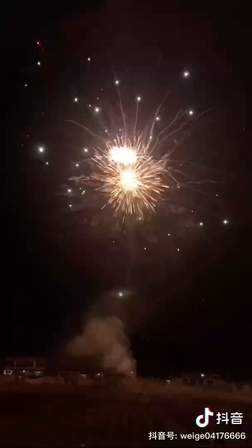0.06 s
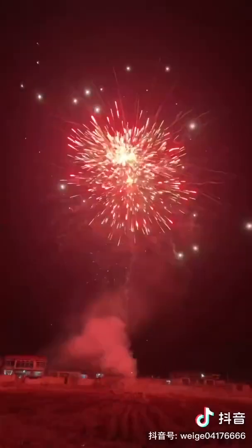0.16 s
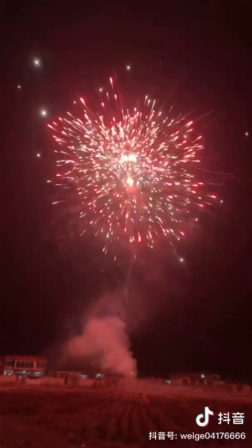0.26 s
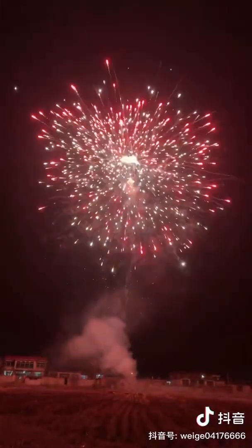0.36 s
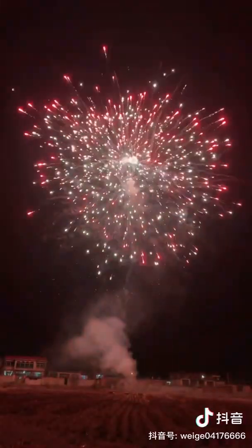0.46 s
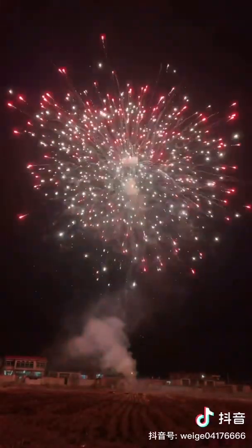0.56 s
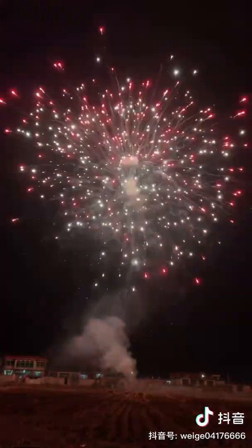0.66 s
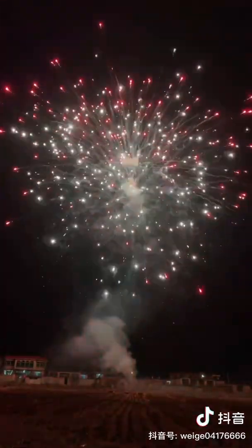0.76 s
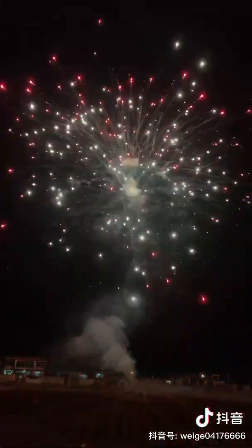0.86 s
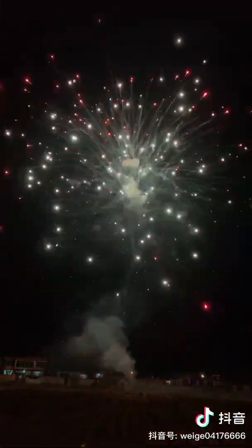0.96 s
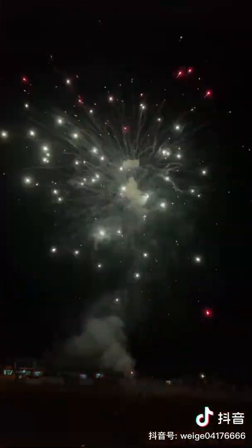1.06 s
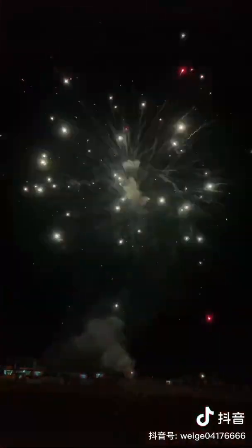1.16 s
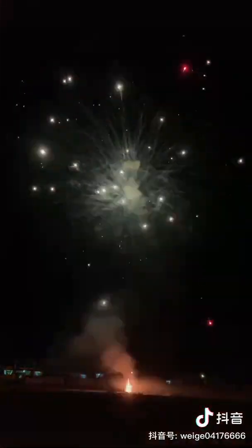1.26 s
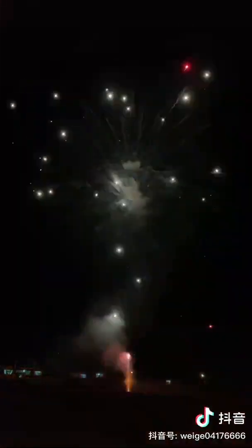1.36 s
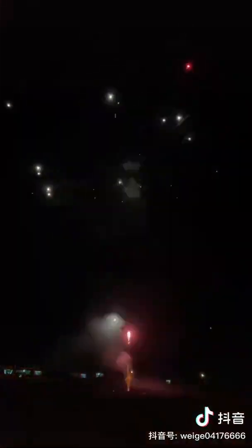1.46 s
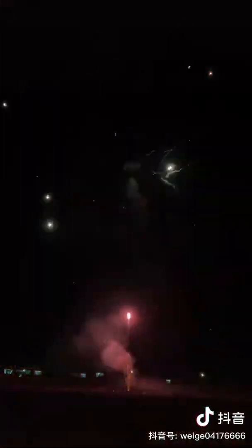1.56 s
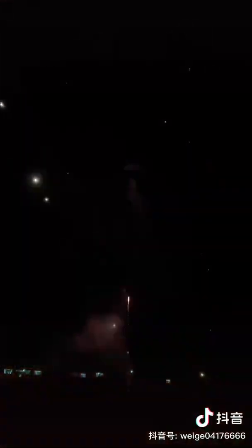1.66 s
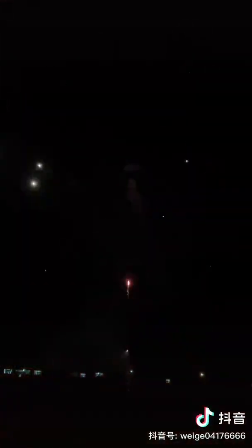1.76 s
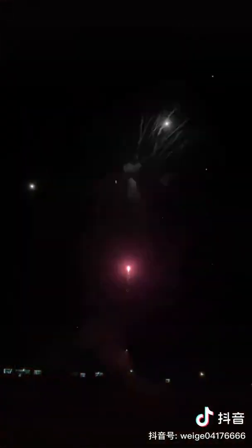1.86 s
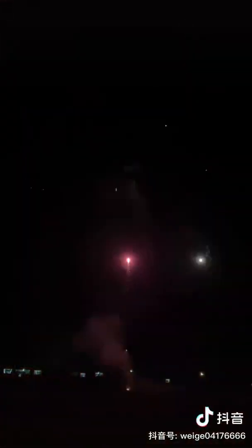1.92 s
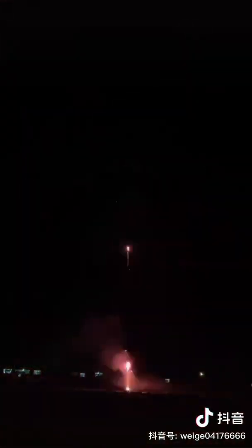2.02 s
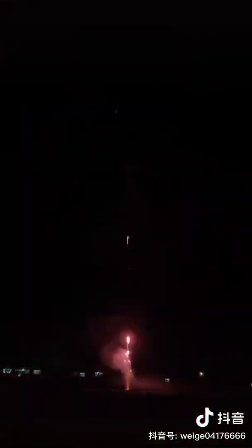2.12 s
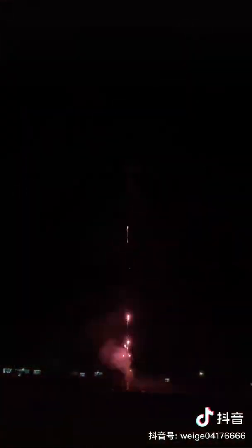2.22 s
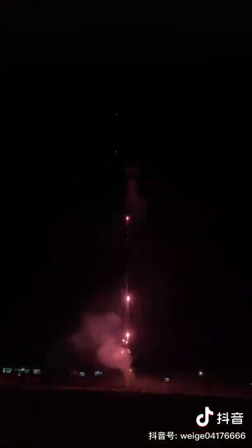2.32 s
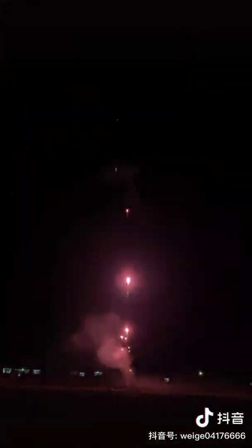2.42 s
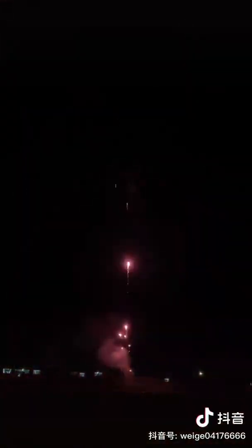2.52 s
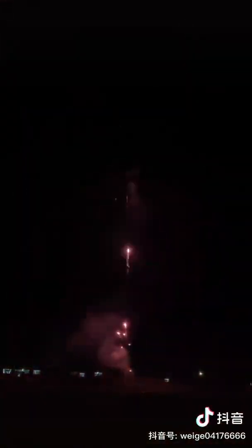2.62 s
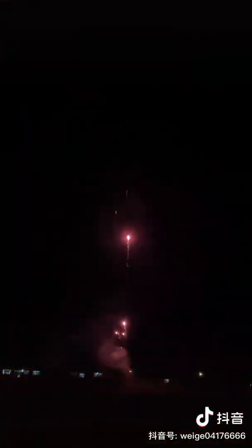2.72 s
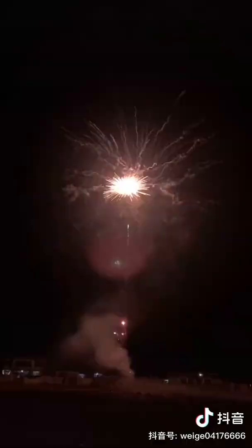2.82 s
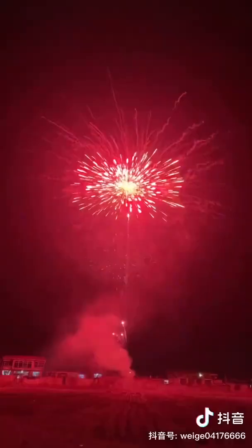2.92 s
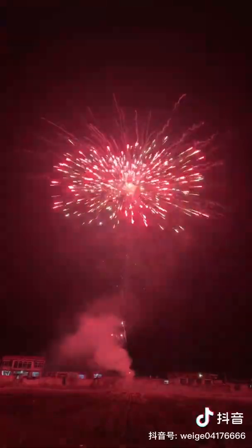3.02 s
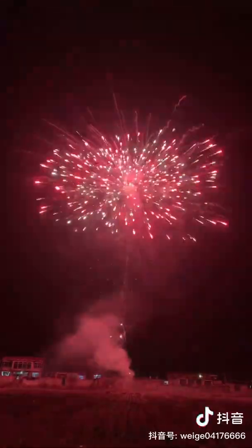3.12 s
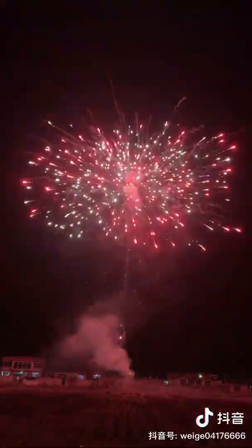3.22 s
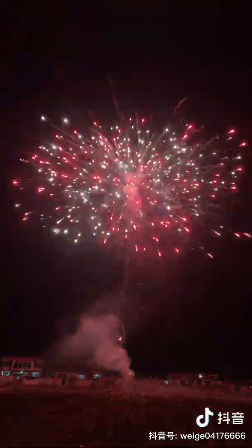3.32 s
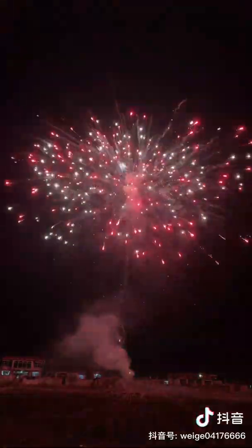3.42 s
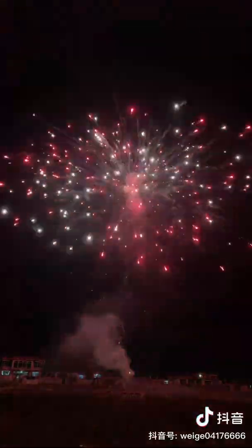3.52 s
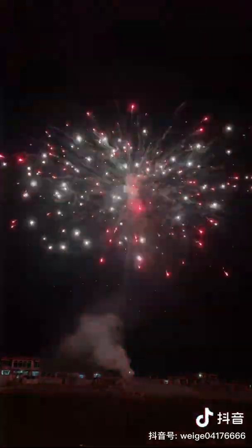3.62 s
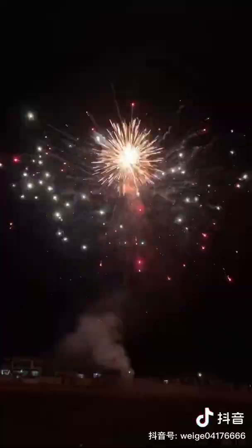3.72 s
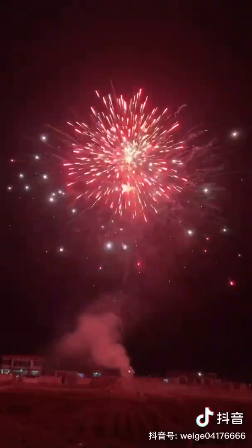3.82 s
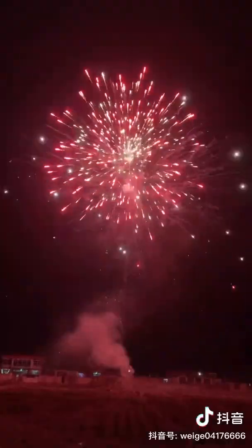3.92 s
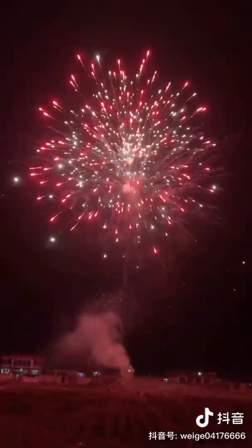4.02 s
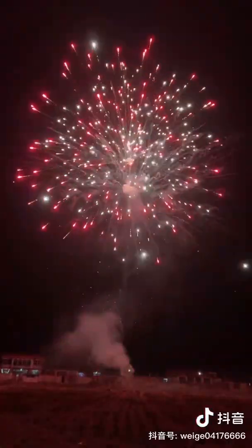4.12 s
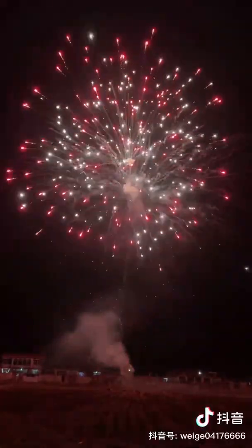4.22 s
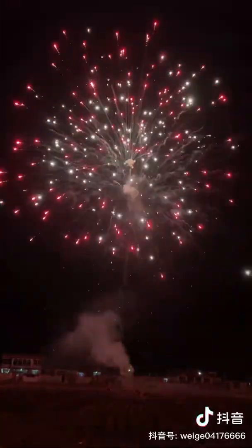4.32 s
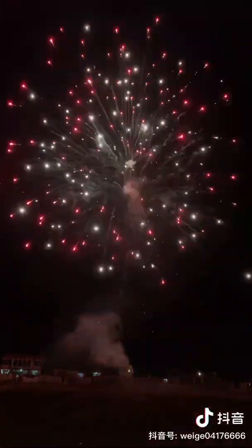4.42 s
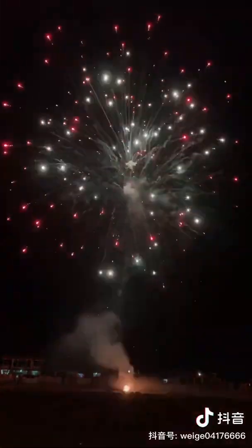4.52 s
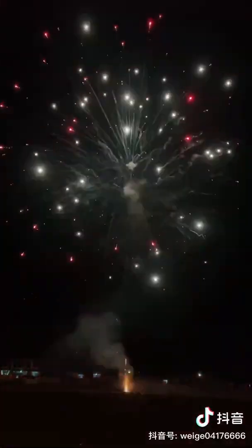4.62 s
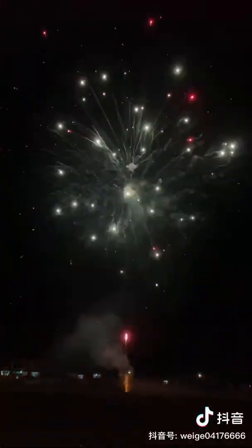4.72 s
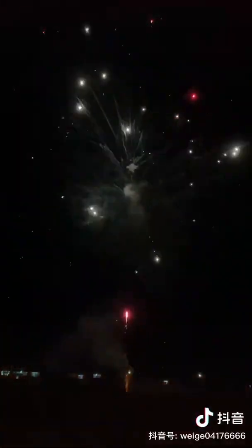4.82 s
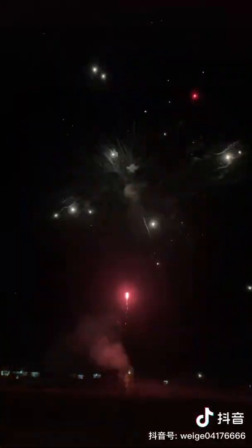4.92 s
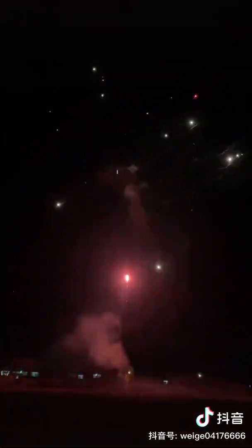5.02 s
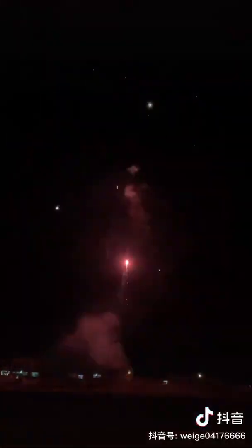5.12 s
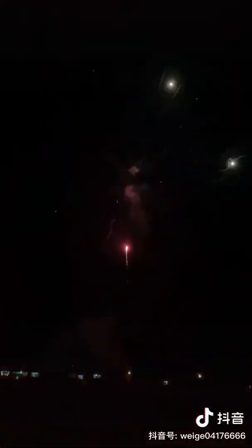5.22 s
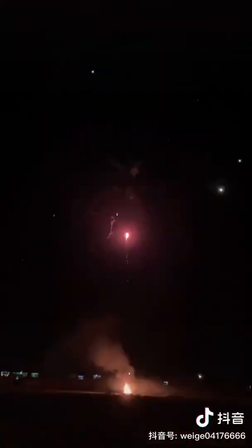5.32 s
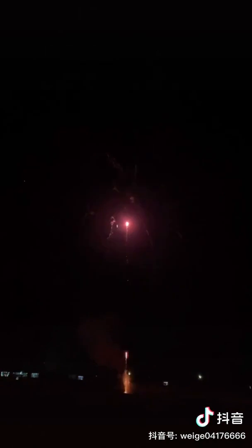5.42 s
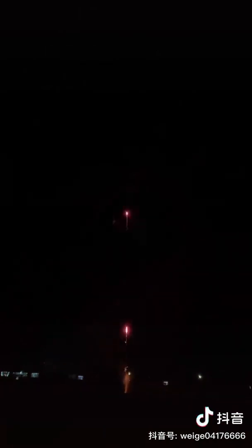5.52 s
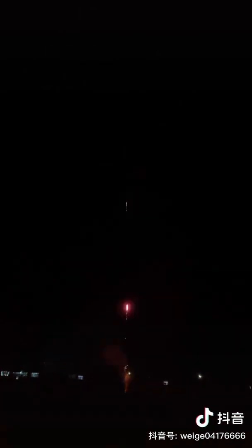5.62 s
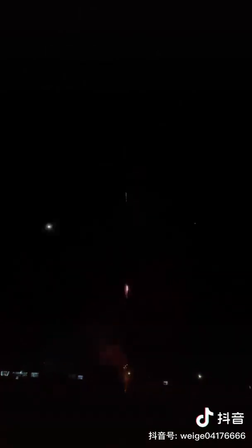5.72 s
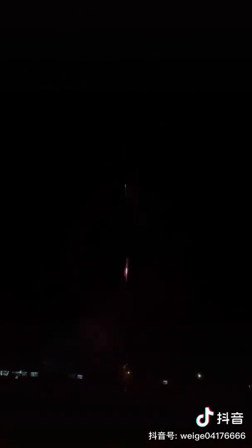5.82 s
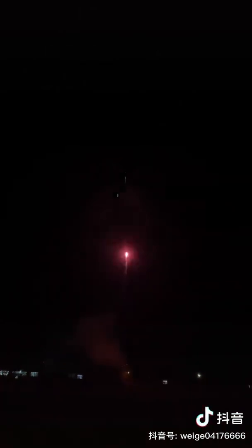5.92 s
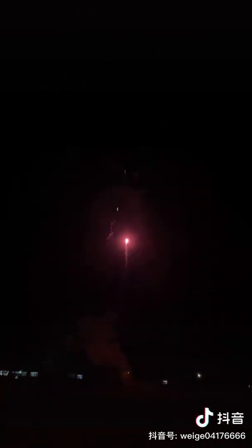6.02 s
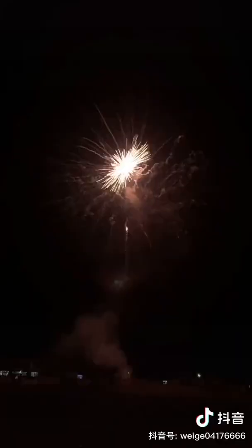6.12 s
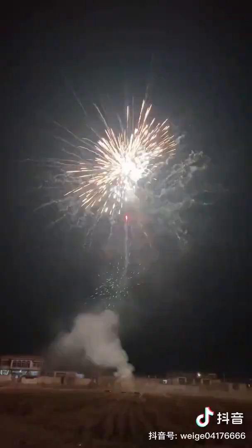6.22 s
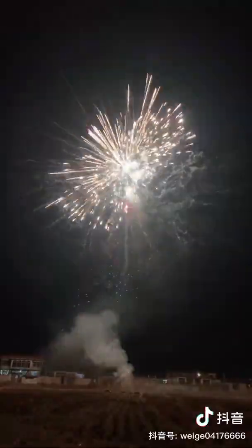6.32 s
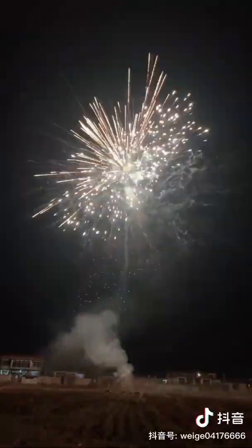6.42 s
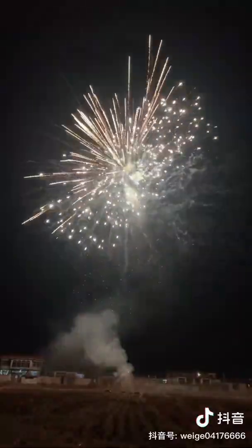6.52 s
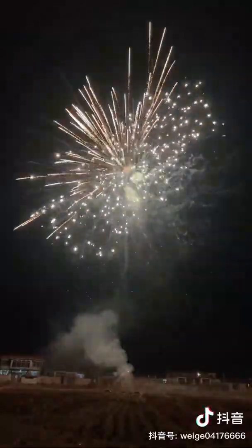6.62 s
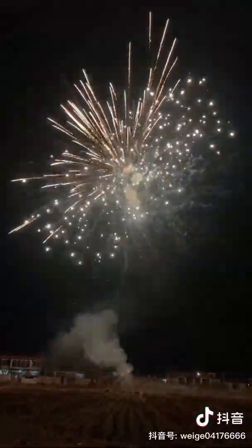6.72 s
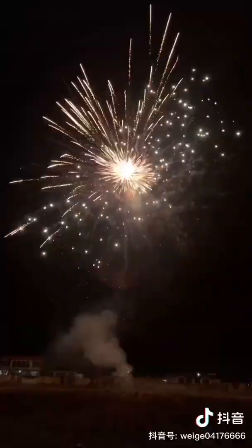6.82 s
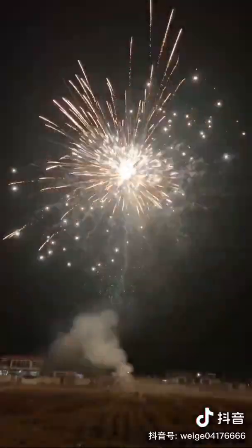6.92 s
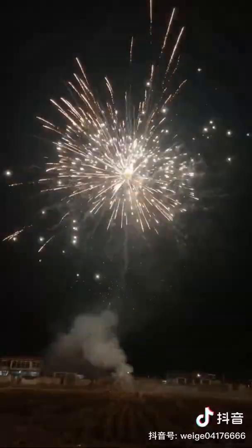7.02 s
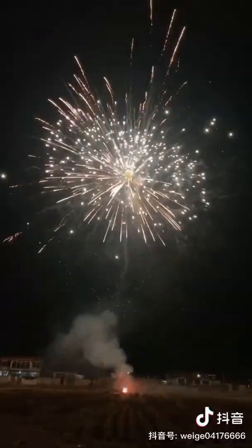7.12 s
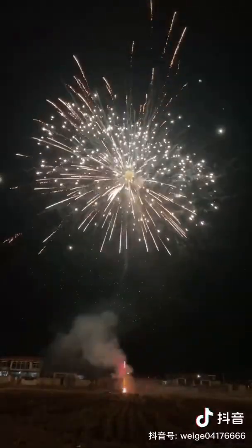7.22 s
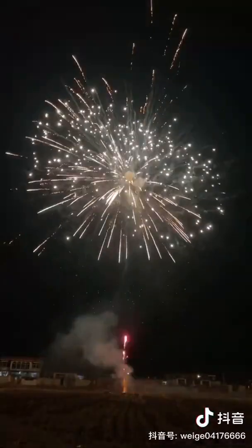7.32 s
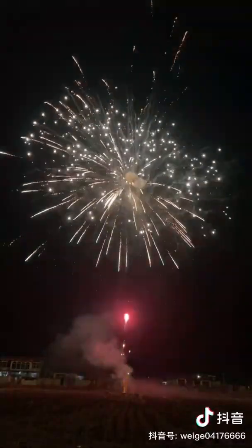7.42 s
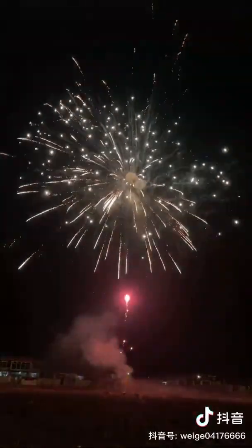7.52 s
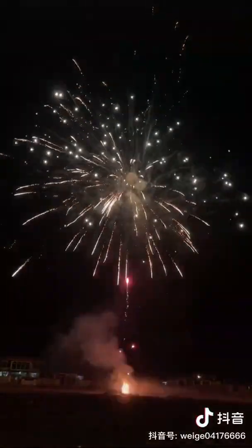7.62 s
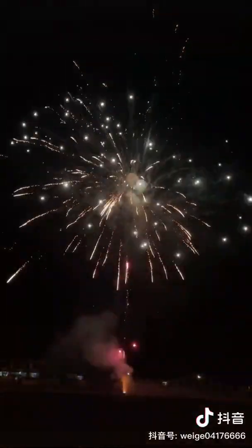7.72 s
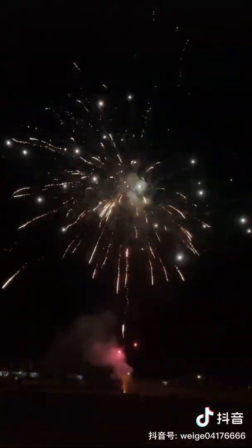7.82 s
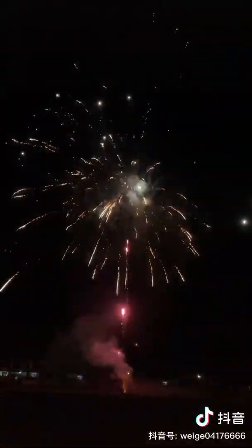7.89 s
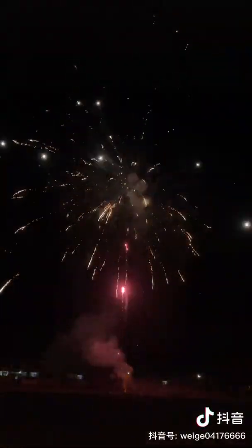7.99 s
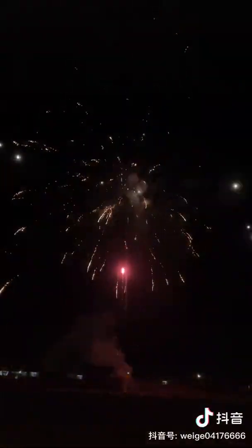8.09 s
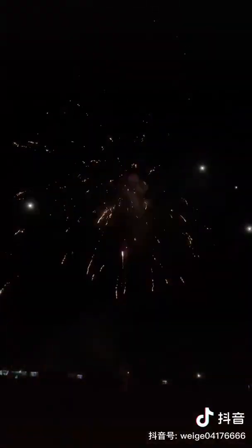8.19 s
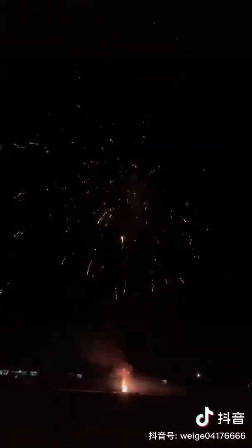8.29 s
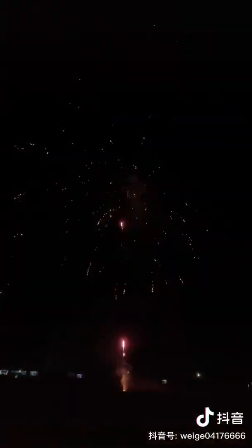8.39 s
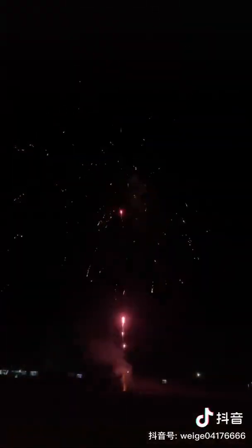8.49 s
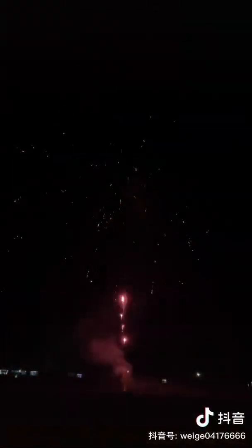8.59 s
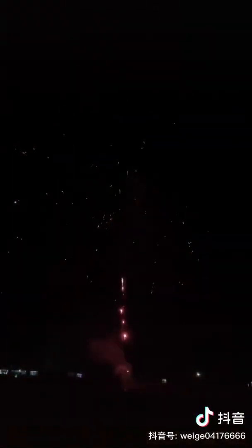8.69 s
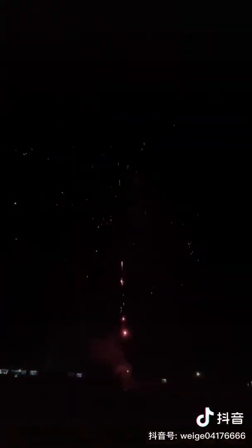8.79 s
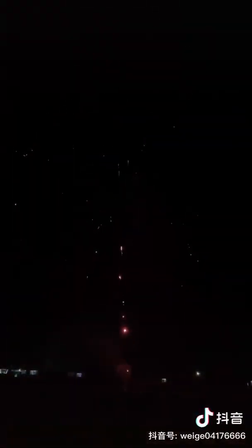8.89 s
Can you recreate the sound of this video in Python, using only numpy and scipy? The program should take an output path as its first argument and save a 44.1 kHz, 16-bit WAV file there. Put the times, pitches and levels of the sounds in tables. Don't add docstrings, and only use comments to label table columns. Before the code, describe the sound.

Outdoors at night, a multi-shot firework across a field is caught by an overloading phone microphone. The roll of an earlier burst is still dying when two harsh, clipped bangs hit at 0.16 and 0.23 seconds, with short splintering crackle, boomy wall echoes and a long low rumble. Dull, bass-heavy launch thuds with faint muzzle cracks follow at 1.4 and 2.1, the second heavier; a string of tiny distant pops runs from 2.3 to 2.7. Very strong bursts strike at 3.0 and 3.8, echoes clumping off house fronts then rolling away. Thuds at 4.7 and 5.5, with faint pops at 5.3, 5.7 and 6.0. Bursts crash again at 6.3 and 7.0, the first with the stronger roll. Three thuds close it at 7.3, 7.75 and 8.4, echoing and fading into faint distant fireworks murmur.

```python
import sys
import numpy as np
from scipy import signal
from scipy.fft import rfft, irfft
from scipy.io import wavfile
from scipy.ndimage import uniform_filter1d

SR = 44100
rng = np.random.default_rng(int(sys.argv[2]) if len(sys.argv) > 2 else 0)


def generate_wav(sig):
    pcm = np.round(np.clip(np.atleast_2d(sig).T, -1, 1) * 32767).astype(np.int16)
    wavfile.write(sys.argv[1], SR, pcm)


def boost(x):
    u = np.asarray(x, float) / 20
    return 10 ** u


N = 394694
HZ = np.fft.rfftfreq(8192, 1 / SR)
LEAD = 600

# (time [s], ground echo delay [ms], echo level [dB], roll level [dB], stretch of echo delays [ratio])
BURSTS = [
    (0.1576, 1.18, -2.5, -25, 0.91),
    (0.2317, 1.18, 5.5, -24, 1.03),
    (2.9775, 1.13, 6.5, -21.5, 0.95),
    (3.8356, 1.246, 2.5, -26.5, 0.94),
    (6.2635, 1.15, 4, -22, 1.02),
    (6.9579, 1.13, 2, -26.5, 0.95),
]
# (time [s], thud level [dB], muzzle crack level [dB], echo level [dB])
LAUNCHES = [
    (1.3701, 13.5, -23, -1),
    (2.091, 16, -20.5, 1),
    (4.6749, 13.5, -21.5, -0.5),
    (5.454, 15.5, -22, 1.5),
    (7.278, 14.5, -23, 3),
    (7.7515, 15.5, -22.5, 0.5),
    (8.3848, 15, -23.5, 2.5),
]
BURST_ROLLS = [(-.858, -25)] + [(row[0], row[3]) for row in BURSTS]
# (frequency [Hz], density [dB per Hz])
CRACK = [(590, -33), (1000, -4), (1480, -1.5), (2020, -7.5), (2350, -17.5), (4240, -26.5), (4930, -32.5),
         (11000, -53), (14300, -83.5), (22000, -120)]
# (frequency [Hz], density [dB per Hz])
BODY = [(300, -42.5), (380, -8), (500, -1), (650, -2), (800, -6), (1000, -15), (1200, -36.5)]
# (frequency [Hz], density [dB per Hz])
FRESH_BOOM = [(15, -51), (25, -16), (88, -2), (200, 1), (313, -9.5), (352, -11.5), (420, -31), (550, -61),
              (920, -120)]
# (frequency [Hz], density [dB per Hz])
SNAP = [(2800, -27), (3500, 0), (4200, -2.5), (5200, -20), (7500, -24.5)]


def evened(x):
    return x / np.sqrt(np.mean(x ** 2) + 1e-20)


def add(mix, s, sound):
    part = mix[round(s * SR):][:len(sound)]
    part += sound[:len(part)]


def colour(x, points):
    f, db = np.transpose(points)
    hz = np.fft.rfftfreq(len(x), 1 / SR)
    gain_db = np.interp(np.log(hz + 1), np.log(f + 1), db, -100, -100)
    return evened(irfft(rfft(x) * boost(gain_db), len(x)))


def low(hz, q):
    return 1 / (1 - (HZ / hz) ** 2 + 1j * HZ / (hz * q))


def blast(ms):
    u = np.arange(8192) / (SR * ms / 1000)
    return -rfft((1 - u) * np.exp(-u))


def vented(spectrum):
    return irfft(-spectrum * (HZ / 192) ** 2 * low(192, .84))


def puff(points, ms, rise_ms=0.54):
    t_ms = np.arange(8192) / SR * 1000
    shape = np.exp(-t_ms / ms) * (1 - np.exp(-t_ms / rise_ms))
    shape *= np.cos(np.pi / 2 * t_ms / t_ms[-1])
    noise = colour(rng.standard_normal(len(t_ms)), points)
    return evened(noise * shape) * np.sqrt(np.mean(shape ** 2))


def scatter(per_s, spread_db):
    chance, sign, size = rng.random((N, 3)).T
    return (chance < per_s / SR) * np.sign(sign - .5) * boost(-spread_db * np.log(size + 0.0064))


def shock(echo_ms):
    ground = 1.13 * np.exp(-2j * np.pi * HZ * echo_ms / 1000) * low(138, 0.67)
    pressure = np.tanh(7.1 * irfft(blast(1.81) * (1 + ground)))
    hand = 0.62 + 0.17 * np.exp(-2j * np.pi * HZ * 0.00037)
    return vented(rfft(pressure) * hand * low(3700, 0.88)) * np.cos(np.linspace(0, np.pi / 2, 8192))


def splinters_and_field():
    # (frequency [Hz], density [dB per Hz])
    splinter = [(900, -33), (1500, -0.5), (3000, 2), (5000, -16), (8000, -21.5), (10500, -34),
                (12000, -22.5), (13500, -27), (16000, -43)]
    casing = boost(-9) * puff(splinter, 1.0) + boost(-29) * puff(splinter, 6.0) + boost(-30.0) * puff(CRACK, 7.7)
    field = boost(-46.5) * puff(CRACK, 130.0) + boost(-61.0) * puff(SNAP, 130.0)
    field += boost(-59) * puff(splinter, 60.0) + boost(-39.5) * puff(BODY, 32.0)
    field += boost(-24) * puff(FRESH_BOOM, 60.0, rise_ms=16.0)
    return casing + field


def bursts():
    # (delay [s], boom level [dB], depth [s])
    fronts = [(0.056, -21.5, 0.053), (.082, -15.5, 0.023), (0.152, -12, 0.019), (0.167, -16, 0.0096),
              (0.199, -20.5, .02), (0.243, -15, 0.016), (0.279, -14, .02), (.31, -18, 0.014),
              (0.378, -20, 0.0285), (.43, -36.5, 0.023), (0.506, -30.5, 0.024), (0.581, -37, 0.022),
              (0.608, -21.5, .02)]
    # (delay [s], level over the roll [dB], decay [ms])
    walls = [(.12, -13, 7), (.152, -8.5, 4.9), (0.243, -10.5, 8), (.285, -0.5, 11), (0.383, 0, 21.6),
             (.452, -7, 9), (.508, -1.5, 6.4), (.575, -8, 13), (.716, -10.5, 12), (.835, -13, 11)]
    # (frequency [Hz], density [dB per Hz])
    slap = [(600, -38), (1000, -8.5), (1450, 2), (1900, -7), (2500, -23.5), (4200, -33.5), (8000, -59),
            (12000, -90)]
    out = np.zeros(N)
    booms = [boost(16.5 + db) * thud(350 * np.exp(-delay / .9)) for delay, db, depth in fronts]
    for s, echo_ms, echo_db, roll_db, stretch in BURSTS:
        add(out, s, boost(9.5) * shock(echo_ms))
        add(out, s, splinters_and_field())
        for boom, (delay, boom_db, depth) in zip(booms, fronts):
            for place, sign in rng.random((3, 2)):
                arrival = s - LEAD / SR + delay * stretch + place * depth
                add(out, arrival, boost(echo_db - 4) * np.sign(sign - .5) * boom)
        height = 1 + .25 * (echo_ms - 1.16)
        for (delay, db, ms), luck in zip(walls, rng.standard_normal(len(walls))):
            level = boost(roll_db + db - 9 + 0.5 * luck)
            add(out, s + delay * height, level * puff(slap, ms, rise_ms=0.68))
    for s, roll_db in BURST_ROLLS:
        tick = puff(slap, 2.5) + boost(-20) * puff(SNAP, 1.4)
        add(out, s + .903, boost(roll_db - 15) * tick)
    return out


def thud(edge_hz=355):
    cancel = (1 + (HZ / 300) ** 2) ** .45 / np.sqrt(1 + (HZ / edge_hz) ** 26)
    wave = vented(blast(1.71) * low(217, .57) * low(217, .6) * cancel)
    return np.roll(wave, LEAD) * signal.windows.tukey(len(wave), .1)


def launches():
    # (delay [s], thud level [dB], crack level [dB])
    fronts = [(0.0641, -21, -12.5), (.076, -22.5, -20), (0.093, -28.5, -30), (.128, -28.5, -27.5),
              (0.245, -33, -31.5), (0.266, -28, -35), (0.281, -17.5, -21.5), (0.297, -34, -28),
              (0.313, -22, -28), (.348, -38, -26.5), (.394, -30.5, -25), (0.417, -18, -30.5),
              (0.437, -26, -32.5), (0.455, -35, -36.5), (.599, -33.5, -33), (.688, -37, -40)]
    # (frequency [Hz], density [dB per Hz])
    muzzle = [(600, -48), (900, -45), (1200, -0.5), (1900, 3), (2400, -5.5), (3000, -30), (3700, -13.5),
              (6000, -25.5), (9000, -35.5), (15500, -45)]
    # (frequency [Hz], density [dB per Hz])
    answer = [(900, -39.5), (1150, -2), (1500, 0.5), (2150, -6), (2450, -27), (4000, -31.5), (7000, -55.5)]
    out = np.zeros(N)
    booms = [thud(350 * np.exp(-row[0] / 0.44)) for row in fronts]
    for s, db, crack_db, echo_db in LAUNCHES:
        add(out, s - LEAD / SR, boost(db) * thud())
        add(out, s, boost(crack_db) * (puff(muzzle, 2.28, rise_ms=0.46) + boost(-12) * puff(muzzle, 5.0)))
        gate = puff(SNAP, 2.0, rise_ms=0.54)
        add(out, s + fronts[0][0], boost(echo_db + crack_db - 17.0) * gate)
        for boom, (delay, thud_db, front_db) in zip(booms, fronts):
            crack = puff(muzzle, 1.5 + 13.4 * delay, rise_ms=0.73)
            damping = np.clip(7.0 * delay + 0.32, 0, .9)
            dull = signal.lfilter([1], [1, -damping], crack)
            dull *= np.std(crack) / np.std(dull)
            returned = puff(answer, 2.47 + 13.6 * delay, rise_ms=0.75)
            add(out, s - LEAD / SR + delay, boost(echo_db + db + thud_db) * boom)
            add(out, s + delay, boost(echo_db + crack_db + front_db - 2.5) * dull)
            add(out, s + delay, boost(echo_db + crack_db + front_db + 1.5) * returned)
    return out


def roll_level(launch_db, far_db, linger_s):
    # (delay [s], strength of the walls [dB])
    village = [(0, -30), (.1, -14), (.17, -1), (.24, -2.5), (0.329, -2.5), (.41, -2.6), (.54, -11.5),
               (.72, -11.5), (1.5, -33)]
    t = np.arange(-SR, N, 64) / SR
    delay, wall_db = np.transpose(village)
    power = boost(far_db) ** 2
    for s, db in BURST_ROLLS:
        beyond = np.maximum(t - s - delay[-1], 0)
        power = power + boost(db + np.interp(t - s, delay, wall_db, -100) - 19.5 * beyond) ** 2
    for s, db, crack_db, echo_db in LAUNCHES:
        beyond = np.maximum(t - s - .3, 0)
        power = power + (t > s) * boost(launch_db + echo_db - 32.5 * beyond) ** 2
    keep = np.exp(-(t[1] - t[0]) / max(linger_s, 1 / SR))
    lingering = signal.lfilter([1 - keep], [1, -keep], power)
    return np.interp(np.arange(N) / SR, t, 10 * np.log10(lingering))


def roll_boom(boom_db):
    # (frequency [Hz], density [dB per Hz])
    early_boom = [(15, -46), (25, -26), (96, 6), (145, -0.5), (227, -11), (313, -22.5), (356, -46.5),
                  (420, -63), (550, -73.5), (920, -120)]
    # (frequency [Hz], density [dB per Hz])
    late_boom = [(15, -48), (25, -25.5), (75, 6), (178, -16), (199, -21), (232, -20), (400, -34),
                 (520, -55.5), (880, -120)]
    # (frequency [Hz], density [dB per Hz])
    flicker = [(11600, -27), (11850, 2.5), (12150, -1.5), (12400, -27.5)]
    taps = scatter(500, 3.2)
    early = np.clip((boom_db + 52.5) / 16, 0, 1)
    shots = np.sort([-1] + [row[0] for row in BURSTS + LAUNCHES])
    t = np.arange(N) / SR
    since_shot = t - shots[np.searchsorted(shots, t) - 1]
    fresh = np.exp(-since_shot / 0.12)
    aged = early * colour(taps, early_boom) + (1 - early) * colour(taps, late_boom)
    boom = fresh * colour(taps, FRESH_BOOM) + (1 - fresh) * aged
    return boom + boost(-66) * early ** 2 * colour(scatter(700, 3.0), flicker)


def roll_crack(boom_db):
    crack = colour(scatter(9000, 3.0), CRACK)
    crack += boost(-27) * colour(scatter(6000, 3.0), SNAP)
    clump = round(0.028 * SR)
    clumps = uniform_filter1d(uniform_filter1d(rng.standard_normal(N), size=clump), size=clump)
    crack *= boost(1.38 * evened(clumps))
    dull = signal.sosfilt(signal.butter(6, 2350, fs=SR, output="sos"), crack)
    near = np.clip((boom_db + 52) / 27.5, 0, 1.3)
    return near * crack + (1 - near) * dull


def roll():
    boom_db = roll_level(launch_db=-44, far_db=-51, linger_s=0.0097)
    body_db = -56.5 + .65 * (roll_level(launch_db=-59.5, far_db=-48.5, linger_s=0.18) + 36)
    crack_db = -49 + 0.7 * (roll_level(launch_db=-50.5, far_db=-55.5, linger_s=0.1) + 36)
    boom = boost(boom_db + 3.5) * roll_boom(boom_db)
    body = boost(body_db + 1.0) * colour(scatter(600, 4.1), BODY)
    crack = boost(crack_db - 1.5) * roll_crack(boom_db)
    return boom + body + crack


def night():
    # (frequency [Hz], density [dB per Hz])
    murmur = [(150, -33), (250, -2.5), (371, -5), (522, -1.5), (888, -18.5), (1460, -3), (2950, -33),
              (6370, -52.5), (15000, -63.5)]
    # (time [s], peak level [dB], pitch [Hz])
    far_pops = [
        (1.315, -33, 610),
        (2.019, -35, 538),
        (2.338, -33, 515),
        (2.4, -35.5, 387),
        (2.473, -33, 500),
        (2.552, -36, 434),
        (2.689, -48, 861),
        (5.274, -35, 500),
        (5.714, -32, 520),
        (6.01, -34.5, 494),
    ]
    out = boost(-60) * colour(scatter(5000, 3.3), murmur)
    t = np.arange(1500) / SR
    shape = np.exp(-t / 0.0043) * (1 - np.exp(-t / 0.001))
    for s, db, hz in far_pops:
        add(out, s, boost(db - 5.0) * np.sin(2 * np.pi * hz * t) * shape)
    return out


def scene():
    return (bursts() + launches() + roll() + night())[None]


def top_cut(x):
    return signal.sosfilt(signal.butter(12, 16670, fs=SR, output="sos"), x)


def record(dry):
    crossovers = [19, 50, 50, 220, 433, 5012]
    x = dry
    for hz in crossovers:
        poles = signal.butter(2, hz, fs=SR)[1]
        x = signal.lfilter(poles[::-1], poles, x)
    x = x / (1 + abs(x / .9) ** 8) ** (1 / 8)
    x = x + boost(-92) * rng.standard_normal(x.shape)
    x = signal.oaconvolve(x, signal.firwin(255, 16100, fs=SR)[None], "same")
    return top_cut(x)


dry = scene()
out = record(dry)
generate_wav(out)
```